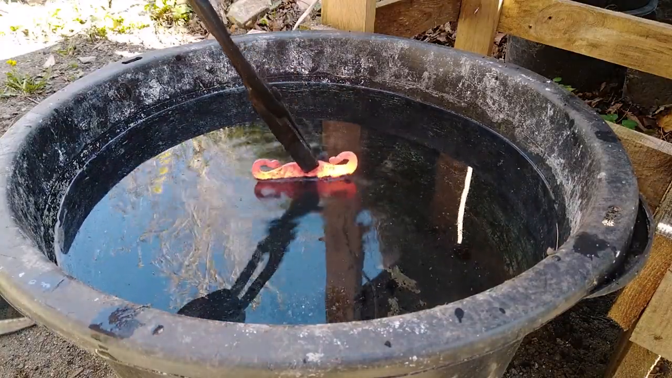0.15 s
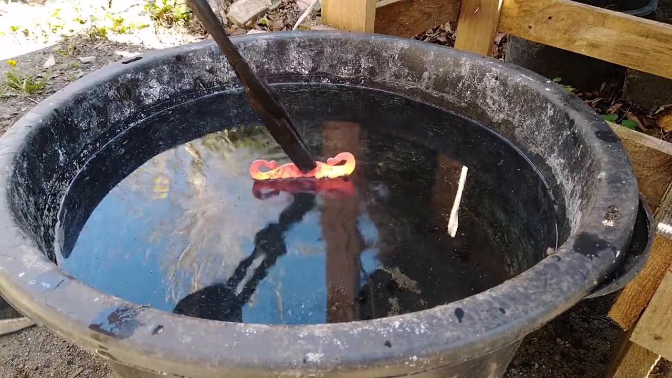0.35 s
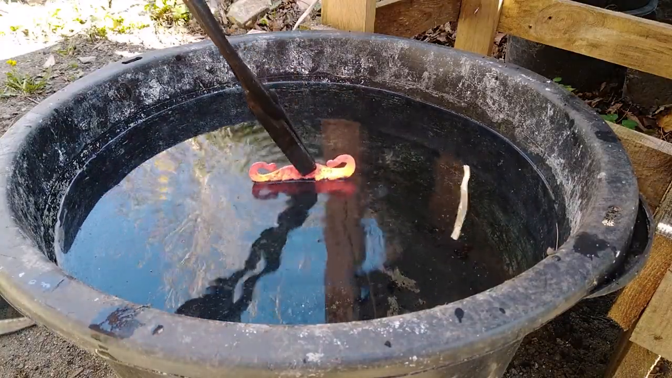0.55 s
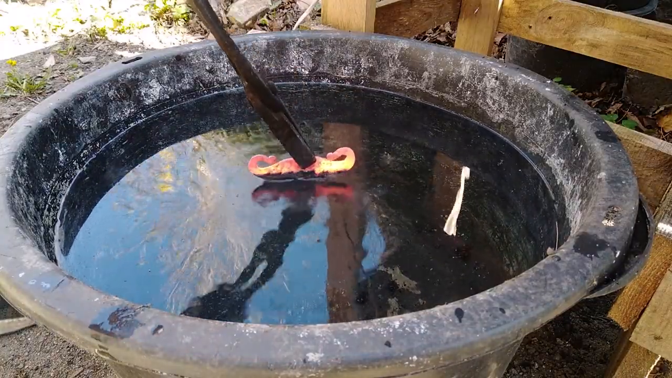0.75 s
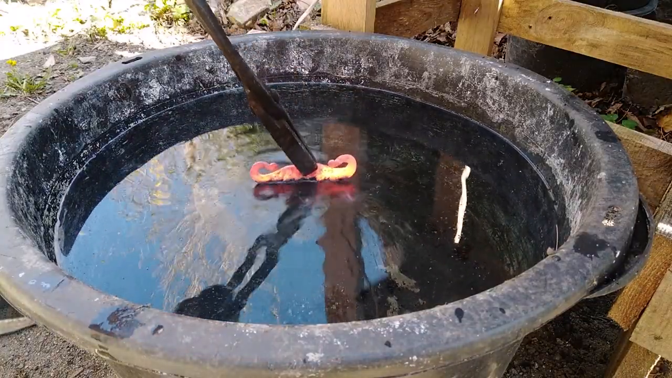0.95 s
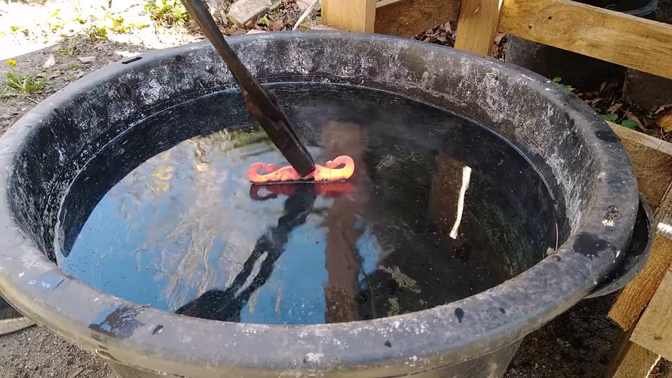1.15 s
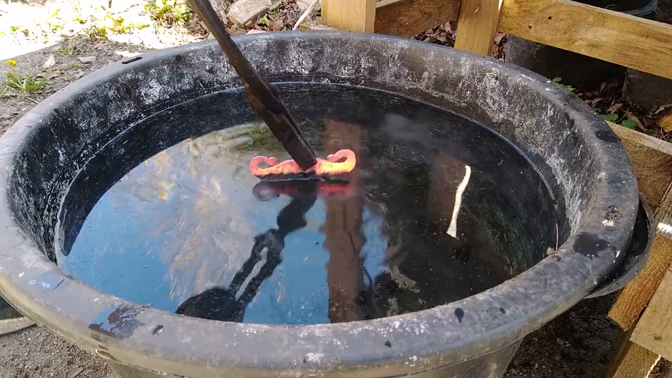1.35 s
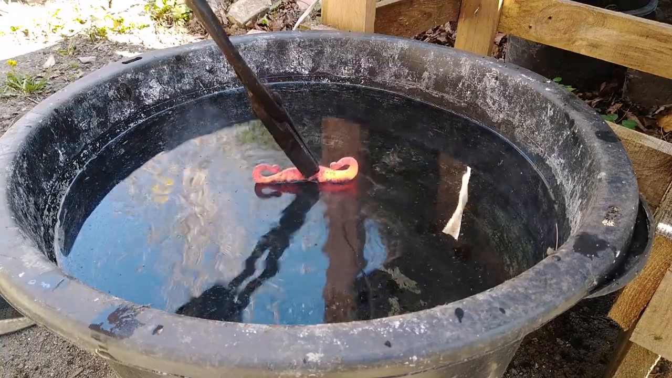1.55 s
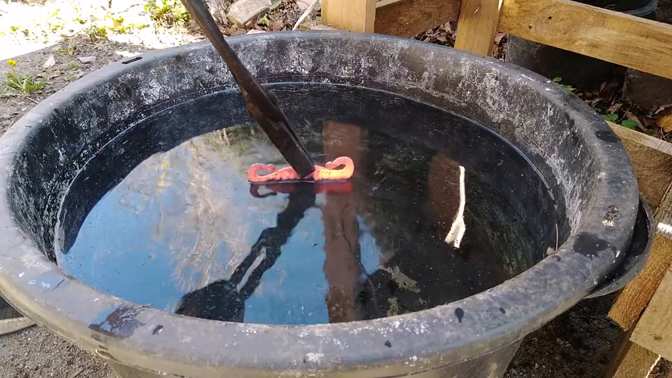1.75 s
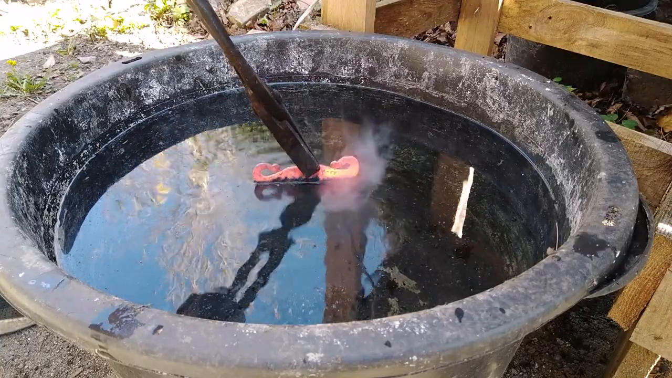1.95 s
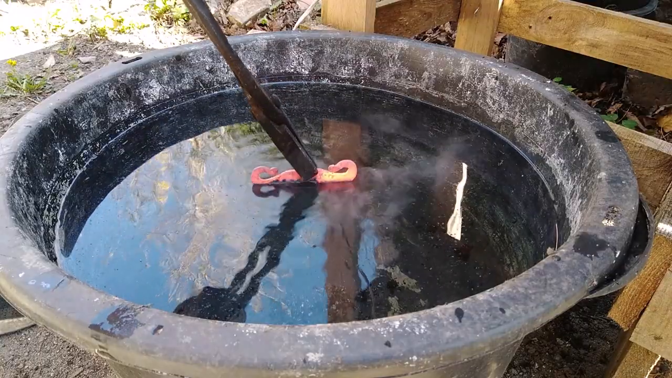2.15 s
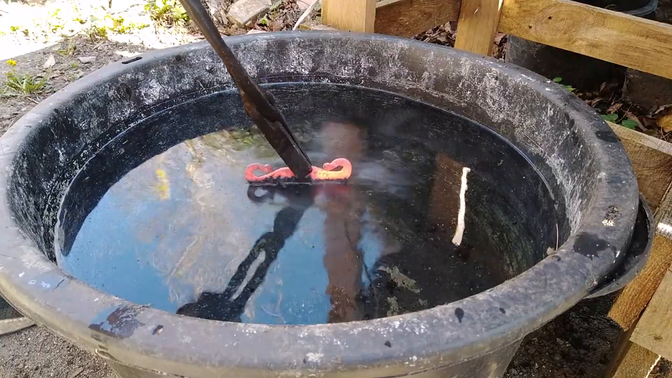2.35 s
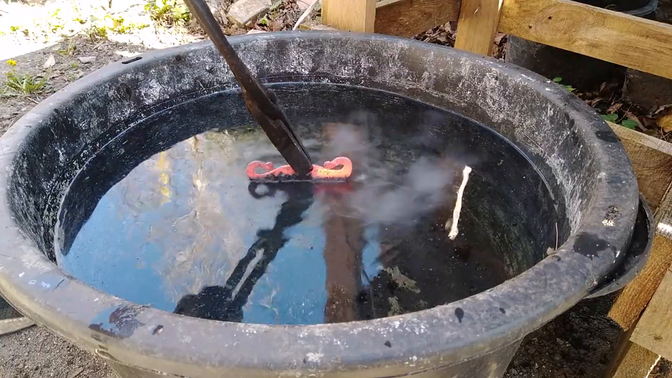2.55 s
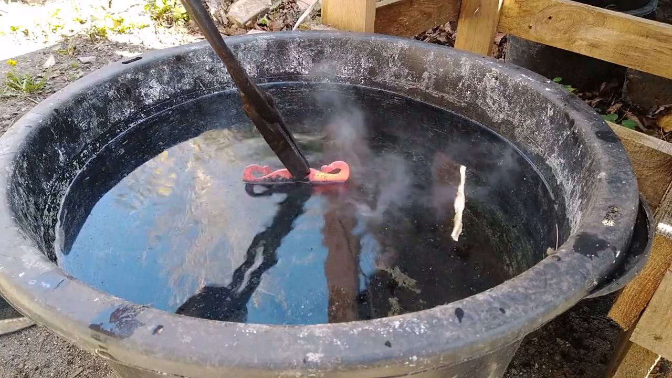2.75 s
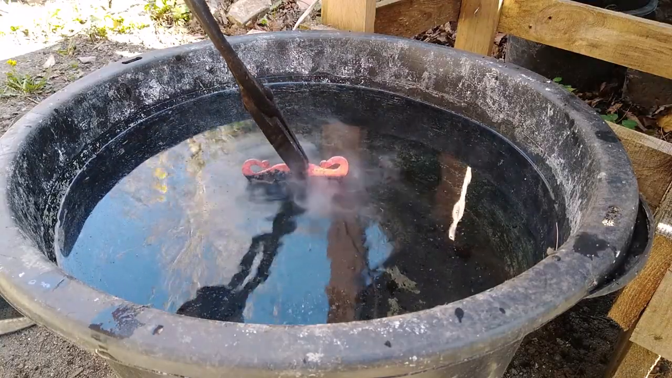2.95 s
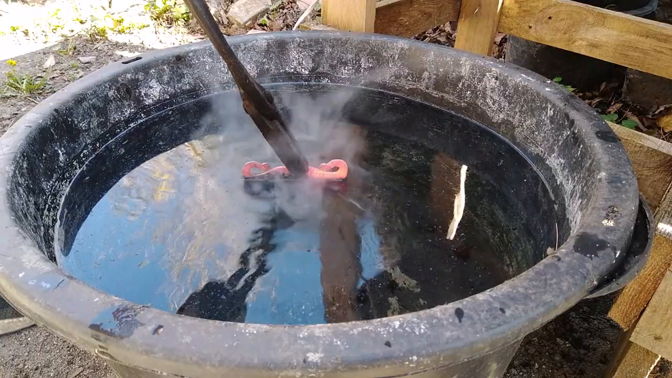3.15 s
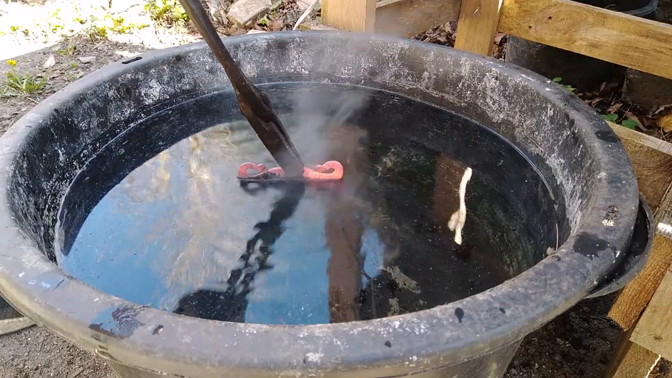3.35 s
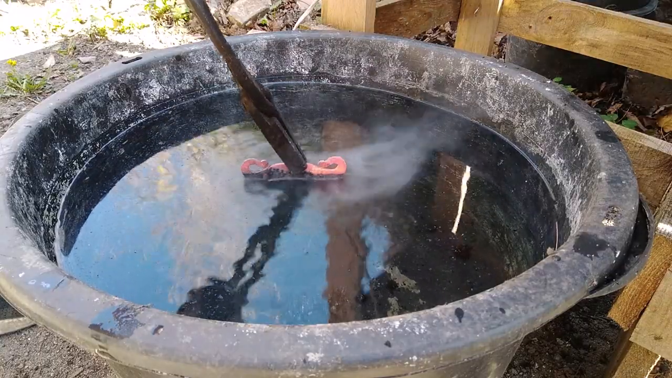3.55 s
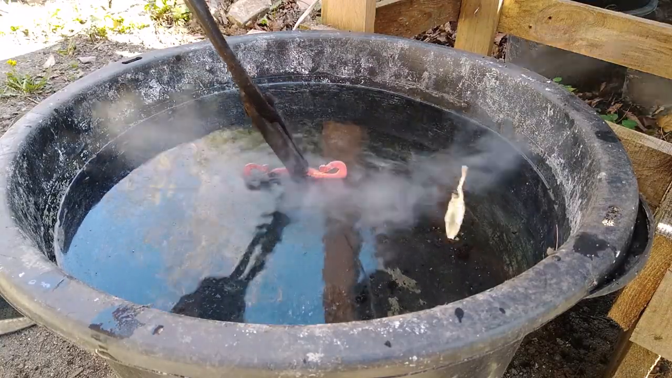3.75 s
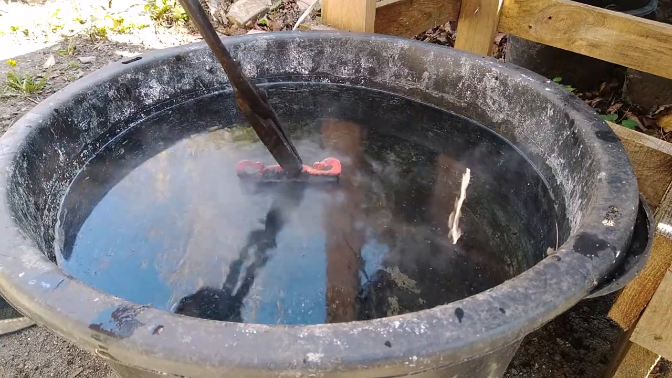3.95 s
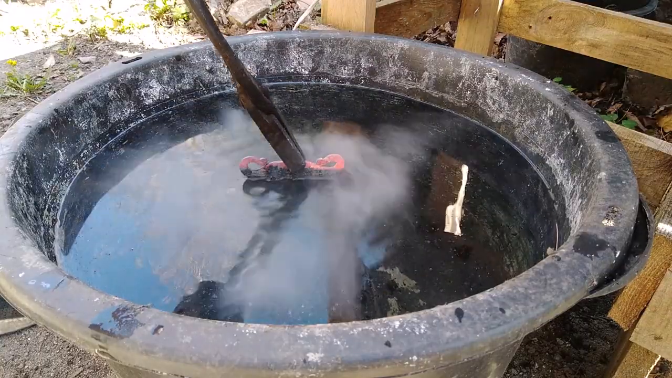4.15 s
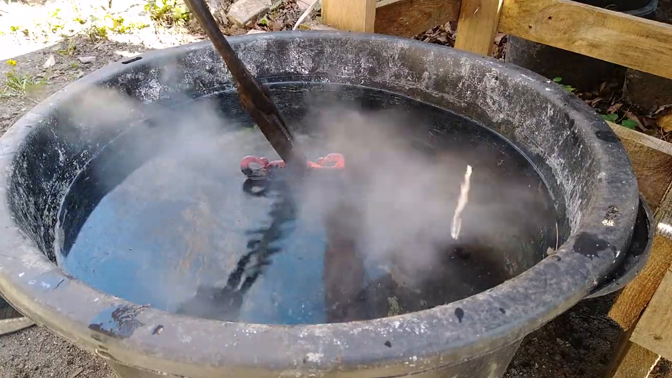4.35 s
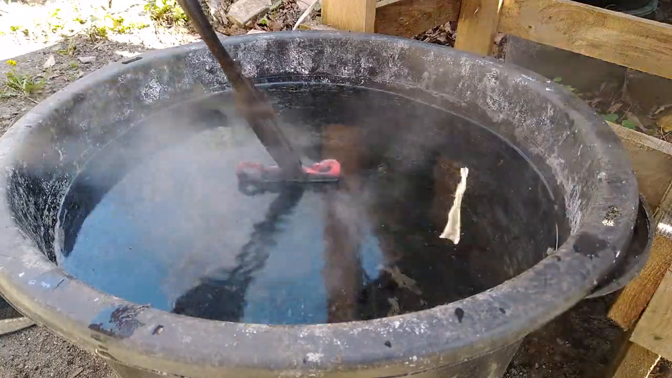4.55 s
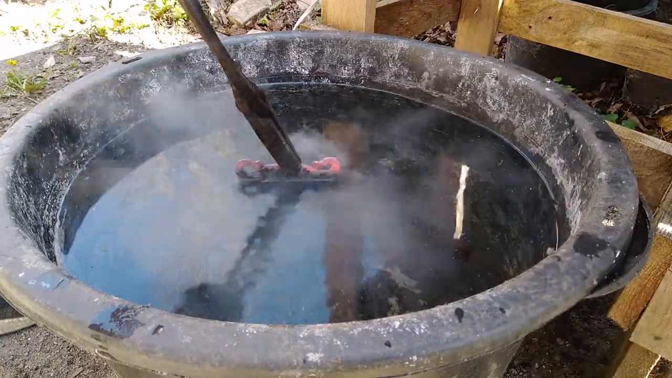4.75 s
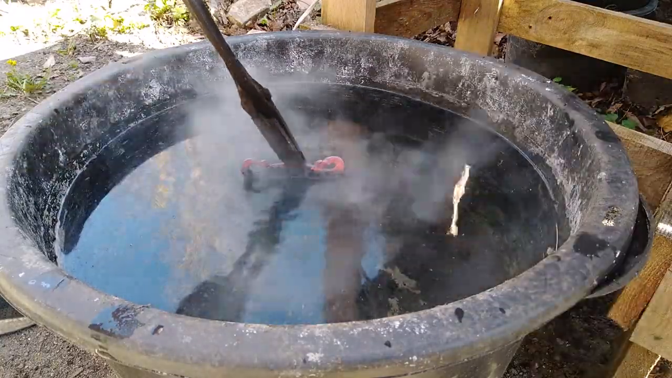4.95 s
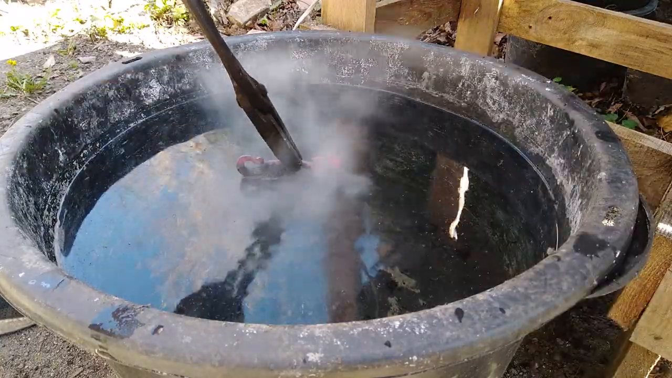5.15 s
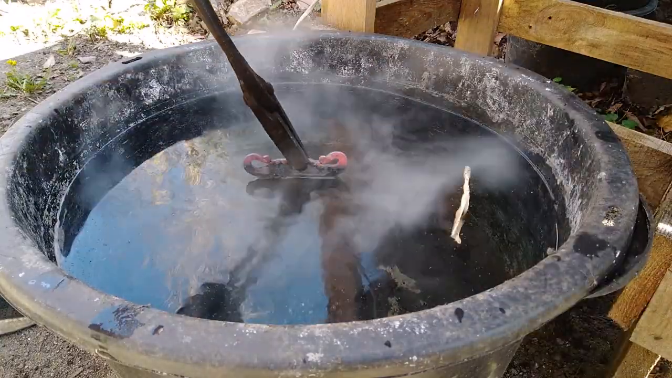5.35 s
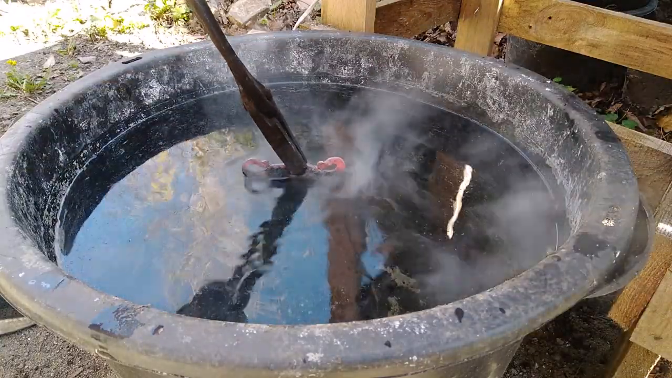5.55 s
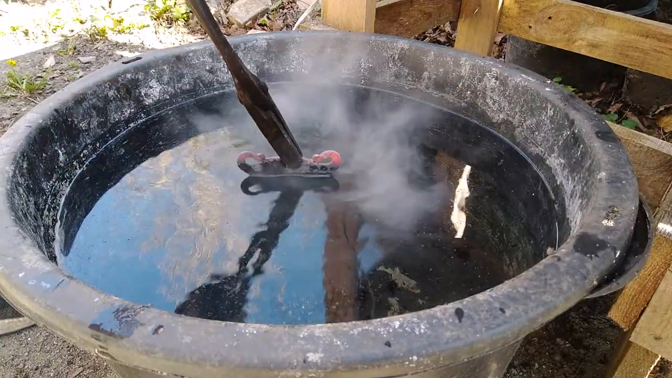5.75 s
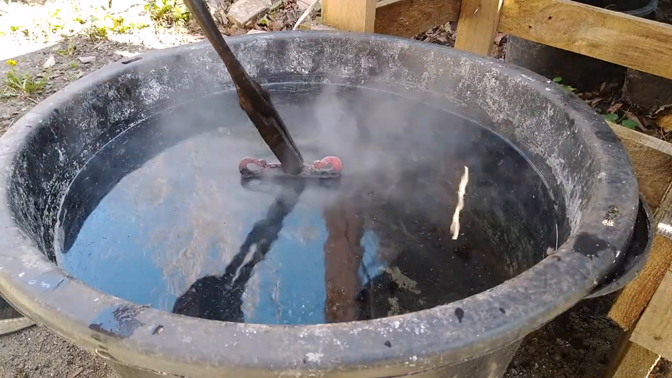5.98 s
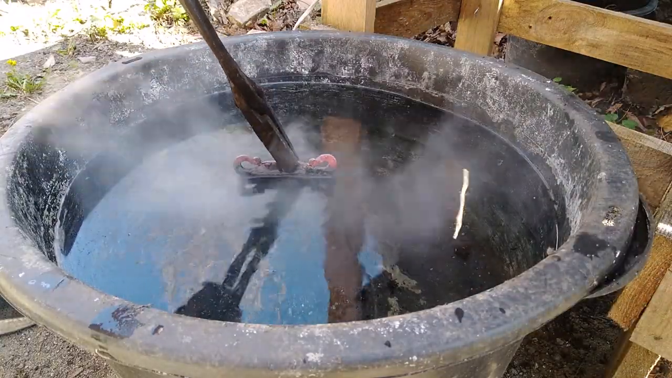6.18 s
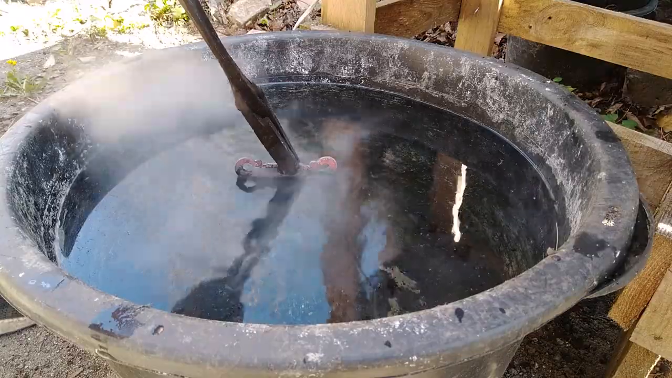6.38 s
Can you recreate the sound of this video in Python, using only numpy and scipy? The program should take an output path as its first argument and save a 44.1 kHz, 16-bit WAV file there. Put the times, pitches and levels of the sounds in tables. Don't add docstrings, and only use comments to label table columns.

```python
import sys
import numpy as np
from scipy import signal
from scipy.fft import rfft, irfft, next_fast_len
from scipy.io import wavfile

SR = 44100
rng = np.random.default_rng(int(sys.argv[2]) if len(sys.argv) > 2 else 0)


def inscribe(sig):
    pcm = np.round(np.clip(np.atleast_2d(sig).T, -1, 1) * 32767)
    wavfile.write(sys.argv[1], SR, pcm.astype(np.int16))


def linear_from_db(decibels):
    return 10 ** (np.asarray(decibels, float) / 20)


N = 282945

# (crest [s], hiss level [dB], rise [s], fall [s], extra level in the tub ring [dB])
STEAM_SURGES = [(.14, -39, 0.14, 0.3, 0.5), (.72, -40, .15, 0.1, 1), (1.31, -40, .16, 0.25, -8.5),
                (1.89, -34.5, 0.19, 0.2, -3.5), (2.48, -33, 0.26, 0.25, 1.7), (2.93, -31, 0.1, 0.32, -0.3),
                (3.54, -29, 0.14, 0.2, 2), (4.01, -32, 0.14, .25, 0.8), (4.58, -33.5, .11, 0.23, -6),
                (5.05, -33, 0.49, 0.17, 0.5), (5.58, -32, .14, 0.13, -5), (6.09, -32.5, 0.16, 0.11, 0),
                (6.53, -29, 0.13, .5, -4)]
SIMMER_DB = -46


def rms_one(x):
    return x / np.sqrt(np.mean(x ** 2) + 1e-20)


def at_hz(rows, hz):
    f, *columns = np.transpose(rows)
    return np.array([np.interp(np.log(hz + 1), np.log(f + 1), c) for c in columns])


def bins_hz(size):
    return np.arange(size // 2 + 1) * SR / size


def coloured(x, response):
    return irfft(rfft(x) * response, x.shape[-1])


def drift(rate_hz):
    r = np.exp(-80 * np.pi * rate_hz / SR)
    slow = signal.lfilter([1], [1, -2 * r, r * r], rng.standard_normal(N // 40 + 2002))[2000:]
    return np.interp(np.arange(N) / 40, np.arange(len(slow)), rms_one(slow))


def swells(rows, rest_db):
    t = np.arange(0, N + 64, 64) / SR
    squareness = 2.4
    power = linear_from_db(2 * rest_db)
    for crest_s, db, rise_s, fall_s in rows:
        u = np.abs((t - crest_s) / np.where(t < crest_s, rise_s, fall_s))
        power = power + linear_from_db(2 * db) * np.exp(-u ** squareness)
    return np.interp(np.arange(N) / SR, t, 10 * np.log10(power))


def steam_vigour_db():
    return swells([row[:4] for row in STEAM_SURGES], SIMMER_DB)


def steam():
    # (lingering [s], lead [s])
    timings = [
        (.08, .09),
        (.02, .025),
        (.002, .002),
        (.002, .002),
    ]
    vigour_db = steam_vigour_db()
    deep_rows = [(s, db + extra_db, rise, fall) for s, db, rise, fall, extra_db in STEAM_SURGES]
    deep_db = swells(deep_rows, SIMMER_DB)
    hz = bins_hz(N)
    hiss = hiss_at_ports(hz)
    low = 1 / (1 + (hz / 1750) ** 8)
    high = 1 / (1 + (5000 / (hz + 1)) ** 8)
    top = 1 / (1 + (12000 / (hz + 1)) ** 16)
    # (dB at mean vigour, share of the swing, cooling dB per s)
    ranges = [(low, deep_db, (-46, 0.69, -0.93)),
              (1 - low - high, vigour_db, (-40, 0.82, -0.21)),
              (high - top, vigour_db, (-37.0, 0.9, 0.03)),
              (top, vigour_db, (-45.5, 0.88, -0.24))]
    sputter_db = 0.35 * drift(11.0) + 0.2 * drift(45)
    out = 0
    for (band, drive_db, law), timing in zip(ranges, timings):
        level_db = answer(drive_db, *law, *timing) + sputter_db + 0.36 * drift(15.0)
        out = out + linear_from_db(level_db) * rms_one(irfft(hiss * band, N))
    return out


def hiss_at_ports(hz):
    # (frequency [Hz], left [dB per Hz], right [dB per Hz])
    port_spectra = [(685, -15.5, -16), (1394, -22, -22.5), (2000, -11.5, -11.5), (3040, -10, -9),
                    (5340, -9, -9.5), (6620, -4, -8), (7480, 1, -9.5), (8540, -5.5, -8), (9440, -18, -6),
                    (10460, -21, -1), (11470, -21, -8.5), (12100, -26.5, -13.5), (14900, -21.5, -24),
                    (15650, -22, -23)]
    # (frequency [Hz], width [Hz], left [dB], right [dB])
    tub_modes = [(800, 59, -11, -9), (1014, 40, -5, 7.5), (1036, 37, -2.5, -4), (1174, 54, 7.5, 10),
                 (1366, 79, -0.5, 8), (1480, 87, 6, -3.5), (1596, 67, -4.5, -0.5), (1820, 91, -1.5, 3.5),
                 (2360, 67, -7, 0), (2670, 146, 4, -3.5), (3760, 420, -2, 2.5), (3670, 160, 2.5, -5),
                 (2240, 140, -1.5, 0.5), (3420, 50, 2.5, 3.5), (3160, 56, 1.5, -11)]
    # (frequency [Hz], share of the hiss common to both ports [0-1])
    common_share = [(700, 0.44), (1170, 0.85), (2000, 0.43), (5000, 0.65), (7500, 0.66), (8500, 0.08),
                    (9800, 0), (16000, 0.06)]
    # (frequency [Hz], phase lead of the left port [rad])
    left_lead = [(500, -.3), (1200, -.7), (2600, -1.2), (3100, -2.3), (5000, -3.1), (6500, -4),
                 (8000, -6.4), (9800, -9.2), (12000, -6.3)]
    common = np.clip(at_hz(common_share, hz), 0, 1)
    shared, *scattered = rfft(vapour_bursts(per_s=30000.0, spread_db=0.5))
    turn = np.exp(.5j * at_hz(left_lead, hz) * [[1], [-1]])
    direct = shared * turn * tub_echoes(hz, echo_db=-20.0, spread_s=.012)
    mix = np.sqrt(common) * direct + np.sqrt(1 - common) * np.array(scattered)
    tub_db = 0
    for f, width, left_db, right_db in tub_modes:
        tub_db = tub_db + np.array([[left_db], [right_db]]) * np.exp(-.5 * ((hz - f) / width) ** 2)
    return mix * linear_from_db(at_hz(port_spectra, hz) + tub_db) / np.sqrt(1 + (650 / (hz + 1)) ** 8)


def vapour_bursts(per_s, spread_db):
    sizes = linear_from_db(spread_db * np.minimum(rng.exponential(1, (3, N)), 4)) * rng.standard_normal((3, N))
    return rms_one(sizes * (rng.random((3, N)) < per_s / SR))


def tub_echoes(hz, echo_db, spread_s):
    delays_s = rng.uniform(0.0993, 1, (8, 2, 1)) * spread_s
    signs = rng.choice([-1, 1], (8, 2, 1))
    return 1 + sum(linear_from_db(echo_db) * s * np.exp(-2j * np.pi * hz * d) for s, d in zip(signs, delays_s))


def answer(vigour_db, mean_db, share, cooling_db_per_s, linger_s, lead_s):
    mean_vigour_db = -37
    r = np.exp(-1 / (max(linger_s, 1e-3) * SR))
    t = np.arange(N) / SR
    swing_db = np.interp(t + lead_s, t, vigour_db) - mean_vigour_db
    late_db = signal.lfilter([1 - r], [1, -r], swing_db, zi=[r * swing_db[0]])[0]
    return mean_db + share * late_db + cooling_db_per_s * t


def breeze(gusts_db):
    # (frequency [Hz], level [dB per Hz])
    eddy_spectrum = [(12, 0.5), (30, 3), (60, -1), (100, -9.5), (160, -13.5), (260, -35), (420, -51.5)]
    size = next_fast_len(3 * N)
    response = linear_from_db(at_hz(eddy_spectrum, bins_hz(size))[0])
    out = []
    for gust_db in gusts_db:
        level_db = gust_db + 2.5 * drift(18)
        speed = np.clip(linear_from_db(.22 * (level_db + 34) + 1.5 * drift(25)), .4, 3)
        field = rms_one(coloured(rng.standard_normal(size), response))
        field = rms_one(field + 0.11 * (field ** 2 - 1))
        out.append(linear_from_db(level_db - 0.5) * np.interp(np.cumsum(speed), np.arange(size), field))
    return np.array(out)


def buffets(gusts_db):
    # (time [s], peak level [dB], width [ms])
    left_strong = [
        (2.575, -24, 6),
        (2.77, -23, 2.5),
        (3.741, -24, 4.16),
        (3.781, -15.5, 7.4),
        (3.985, -11.5, 1.97),
        (4.037, -24, 4.7),
        (4.293, -27, 5),
        (5.483, -32, 2.53),
    ]
    # (time [s], peak level [dB], width [ms])
    right_strong = [(2.161, -16.5, 1.56), (2.467, -13.5, 1.8), (2.503, -17, 3.45), (2.632, -18, 4.3),
                    (2.692, -14.5, 2.8), (2.755, -13.5, 2.3), (2.887, -21.5, 2.23), (3.018, -18.5, 4),
                    (3.161, -12.5, 6.6), (3.333, -14, 4.53), (3.731, -16.5, 2.7), (3.766, -16.5, 4.1),
                    (3.851, -20, 3.8), (3.866, -16, 1.87), (3.893, -17.5, 1.98), (4.067, -16.5, 3.6),
                    (4.105, -19, 0.91), (4.194, -15, 2.5), (4.606, -20, 2.6), (5.004, -17.5, 3),
                    (5.063, -20.5, 3.36), (5.341, -21.5, 1.5), (5.4, -20.5, 1.9), (5.494, -11.5, 3.1),
                    (5.547, -12, 1.97), (5.821, -14, 2.8), (5.862, -20.5, 2.3), (5.987, -19, 1.92),
                    (6.333, -13.5, 2.27), (6.352, -12, 1.48)]
    rows = []
    for port, strong in enumerate((left_strong, right_strong)):
        eddies = list(strong) + lesser_eddies(gusts_db[port], strong)
        rows += [(*row, port) for row in eddies]
    lean = rng.uniform(-0.92, 1, len(rows))
    swirl_band = signal.butter(2, [140, 450], "band", fs=SR, output="sos")
    swirl = rms_one(signal.sosfilt(swirl_band, rng.standard_normal(N + 4000)))
    out = np.zeros((2, N + 4000))
    around = np.arange(-2000, 2000)
    for (s, peak_db, width_ms, port), tilt in zip(rows, lean):
        at = round(s * SR)
        u = around / (width_ms * SR / 1000)
        flank = np.abs(u) / (1 + 0.14 * tilt * np.sign(u))
        push = 1.5 * np.exp(-2.2 * flank ** 2.9)
        trough = 0.39 * np.exp(-.15 * (u - .6) ** 2)
        wake = linear_from_db(-24.0) * np.exp(-.5 * (around / SR / 0.01) ** 2) * swirl[at:at + 4000]
        out[port, at:at + 4000] += linear_from_db(peak_db) * (push - trough + wake)
    return signal.sosfilt(signal.butter(2, 650, fs=SR, output="sos"), out)[:, 2015:N + 2015]


def lesser_eddies(level_db, strong):
    gap_s, shelter_s, shelter_db = .055, 0.026, -9.0
    slots_s = np.arange(0, N / SR, gap_s)[:-1]
    s = slots_s + gap_s * rng.random(len(slots_s))
    chance = rng.standard_normal((len(slots_s), 2))
    gust_db = level_db[(s * SR).astype(int)]
    nearest_s = np.abs(s[:, None] - np.transpose(strong)[0]).min(axis=1)
    peak_db = gust_db + 5.0 + 3.0 * chance[:, 0]
    peak_db = peak_db + shelter_db * np.exp(-(nearest_s / shelter_s) ** 2)
    width_ms = 3.6 * np.exp(0.5 * chance[:, 1] - 0.034 * (gust_db + 30))
    return list(zip(s, peak_db, np.maximum(width_ms, 2.2)))


def yard():
    # (frequency [Hz], level [dB per Hz])
    air_spectrum = [(60, 9.5), (140, -1), (200, -0.5), (270, -9.5), (350, -5), (500, -6), (690, -16),
                    (790, -15.5), (1000, -15), (2000, -38)]
    # (frequency [Hz], level [dB], width [Hz])
    hums = [
        (177.6, -55.5, 1.2),
    ]
    common_share = 0.78
    hz = bins_hz(N)
    t = np.arange(N) / SR
    shared, *own = rng.standard_normal((3, N))
    air = np.sqrt(common_share) * shared + np.sqrt(1 - common_share) * np.array(own)
    response = linear_from_db(at_hz(air_spectrum, hz)) * (hz > 40) * (hz < 4000)
    air_db = -50 + 2.5 * np.sin(np.pi * np.arange(N) / N) + 1.2 * drift(5.4)
    out = linear_from_db(air_db) * rms_one(coloured(air, response))
    for hum_hz, level_db, width_hz in hums:
        phase = 2 * np.pi * np.cumsum(hum_hz + 0.304 * width_hz * drift(2.9)) / SR
        hum_db = level_db - 1.5 * t + 1.2 * drift(2.2)
        out = out + linear_from_db(hum_db) * np.sqrt(2) * np.sin(phase)
    return out


def scene():
    # (crest [s], level [dB], rise [s], fall [s])
    left_gusts = [
        (1.81, -49.5, 0.039, 0.47),
        (2.49, -36.5, 0.07, 0.58),
        (3.46, -37.0, 0.05, 0.095),
        (3.75, -33.5, 0.043, 0.12),
        (3.98, -28, 0.04, 0.079),
        (4.28, -35.0, 0.07, 0.11),
        (4.93, -45.5, 0.52, 0.51),
        (5.48, -34.0, 0.11, 0.062),
        (6.04, -43.5, 0.52, 0.023),
        (6.28, -38, 0.22, 0.12),
    ]
    # (crest [s], level [dB], rise [s], fall [s])
    right_gusts = [(0.1, -43.5, 0.032, 0.31), (1.56, -39, 0.064, 0.18), (1.95, -35.0, 0.042, 0.094),
                   (2.14, -33, 0.037, 0.22), (2.59, -23.5, 0.11, 0.18), (3.03, -26.5, 0.09, 0.28),
                   (3.68, -26.0, 0.035, 0.38), (4.27, -26.0, 0.24, 0.033), (4.53, -29, 0.061, 0.12),
                   (4.99, -28.5, 0.11, 0.11), (5.54, -23.0, 0.13, 0.032), (5.94, -25.0, 0.2, 0.064),
                   (6.1, -25.5, 0.03, 0.2), (6.37, -21, 0.077, 0.04)]
    calm_db = -47.5
    gusts_db = swells(left_gusts, calm_db), swells(right_gusts, calm_db)
    return steam() + breeze(gusts_db) + buffets(gusts_db) + yard()


def drop_faint_bands(x, follow, scatter_db):
    # (frequency [Hz], threshold over the hiss [dB])
    audible = [(270, -34), (420, -45), (800, -39.5), (1150, -46), (1600, -42), (2400, -41), (4000, -40),
               (9500, -44), (11000, -43), (12500, -39.5), (15500, -41)]
    window = np.sqrt(signal.get_window("hann", 2048))
    hz, s, z = signal.stft(x, SR, window, nperseg=2048)
    width_hz = np.clip(hz / 60, 40, 220)
    band = np.cumsum(hz[1] / width_hz).astype(int)
    member = (band == np.arange(band[-1] + 1)[:, None]) / np.bincount(band)[:, None]
    level_db = 10 * np.log10(member @ np.abs(z) ** 2 + 1e-20)
    hiss_db = np.interp(s, np.arange(N) / SR, steam_vigour_db())
    limit_db = (member @ at_hz(audible, hz)[0])[:, None] - 37 + follow * (hiss_db + 35)
    keep = level_db > limit_db + scatter_db * rng.standard_normal(level_db.shape)
    gain = np.maximum(keep[:, band], .08)
    return signal.istft(z * gain, SR, window, nperseg=2048)[1][:, :N]


def top_cut(x):
    return signal.sosfilt(signal.butter(12, 17030, fs=SR, output="sos"), x)


def record(dry):
    x = signal.sosfilt(signal.butter(2, 16, "high", fs=SR, output="sos"), dry)
    x = drop_faint_bands(x, follow=.75, scatter_db=2.0)
    mix = coloured(x, bins_hz(N) < 15745)
    return top_cut(mix)


dry = scene()
out = record(dry)
inscribe(out)
```